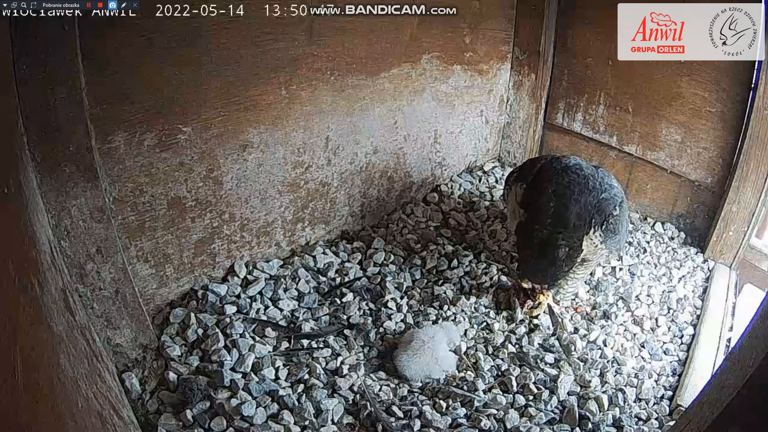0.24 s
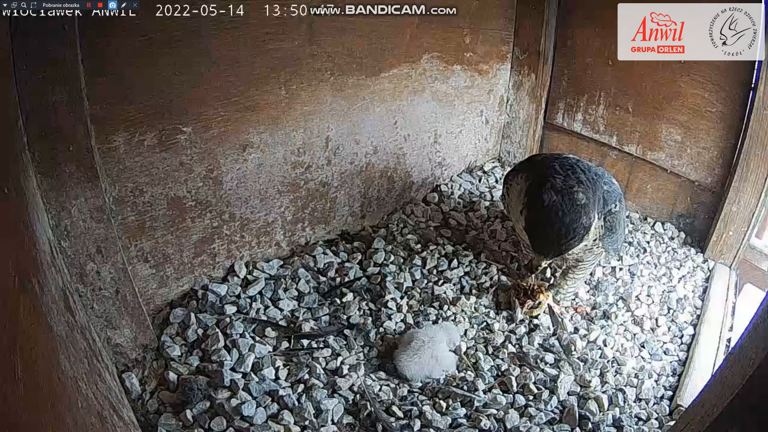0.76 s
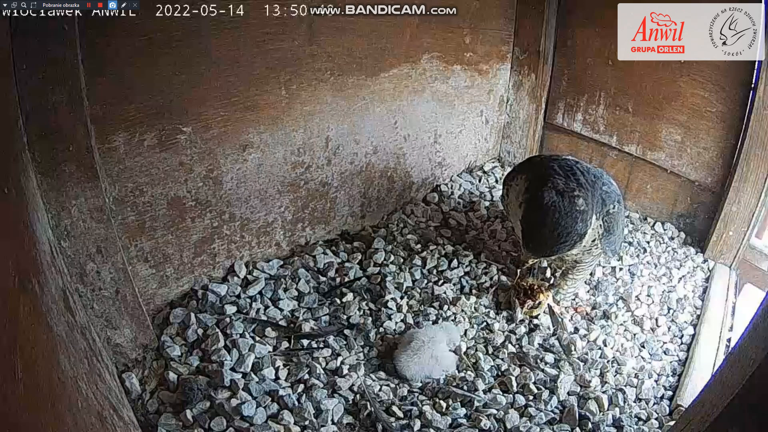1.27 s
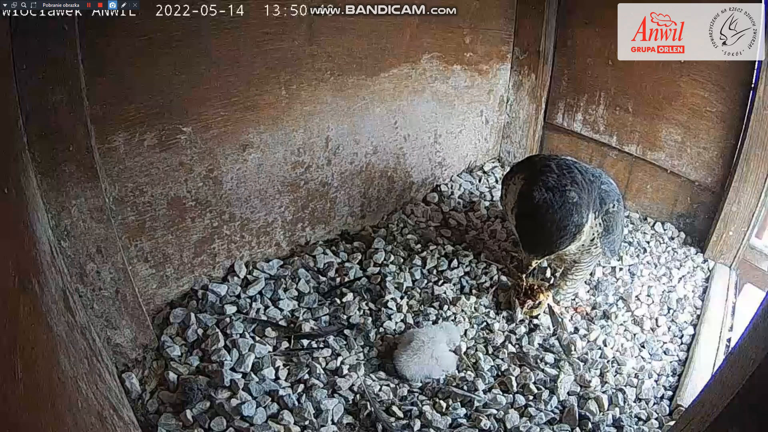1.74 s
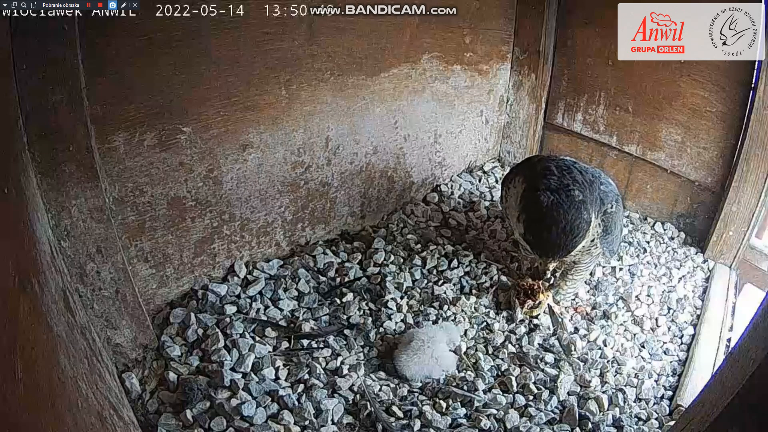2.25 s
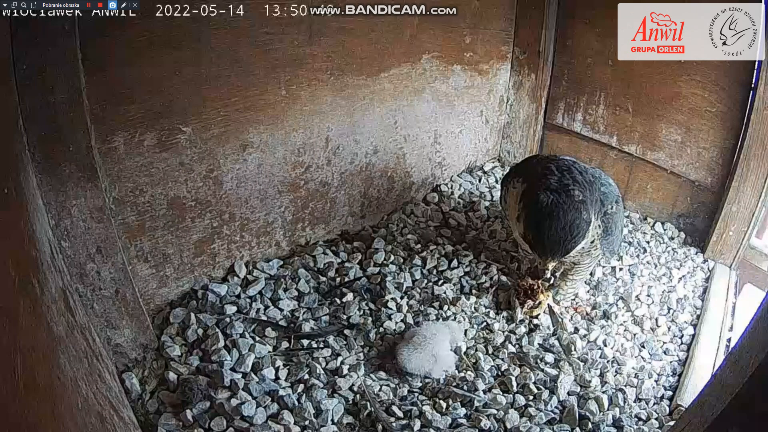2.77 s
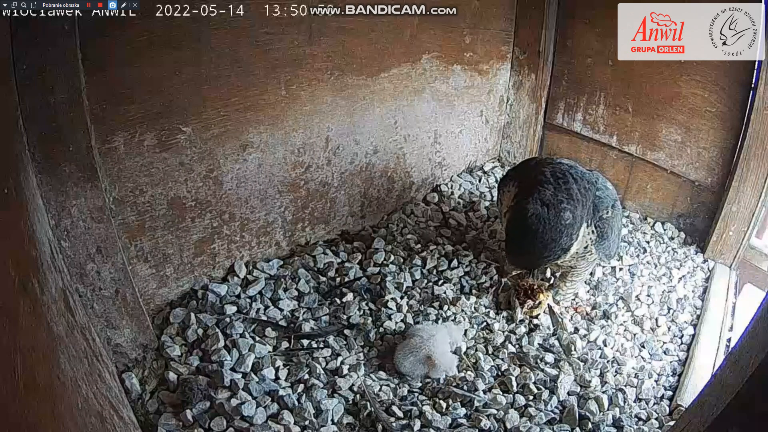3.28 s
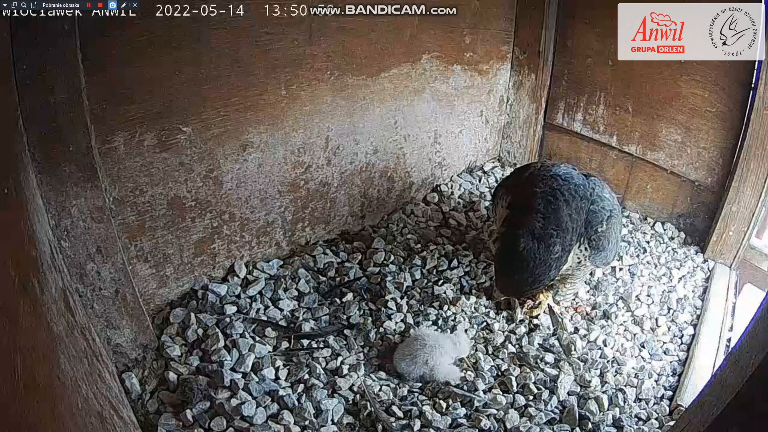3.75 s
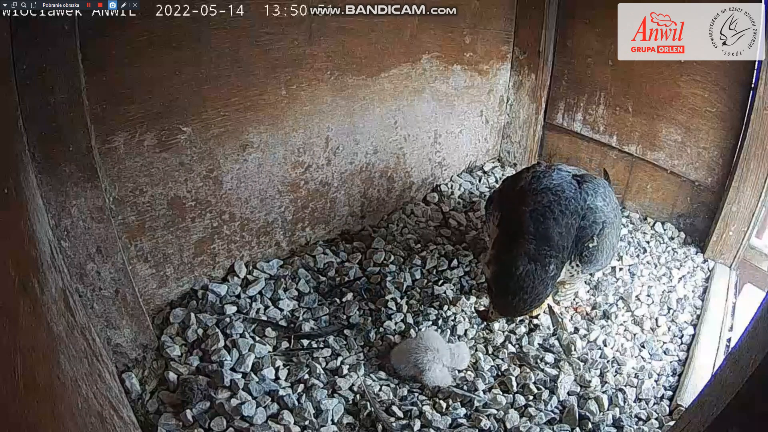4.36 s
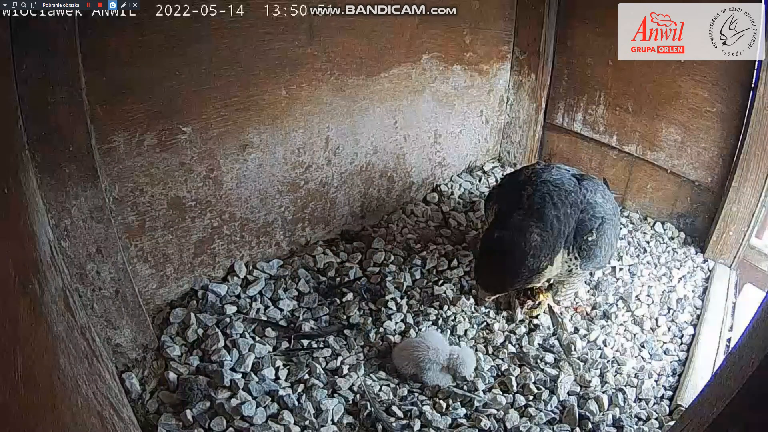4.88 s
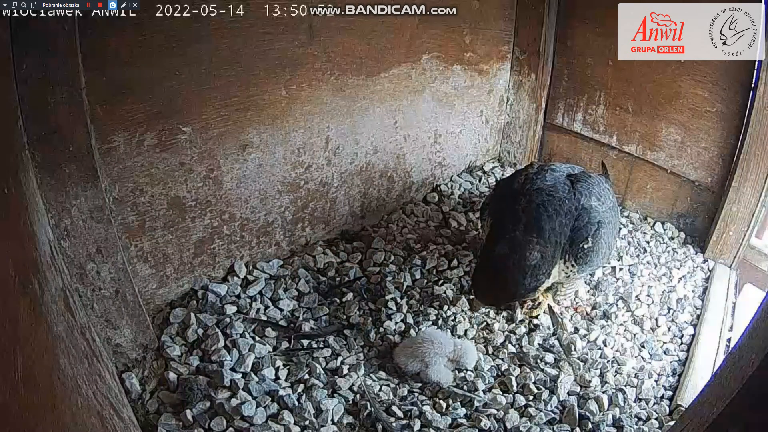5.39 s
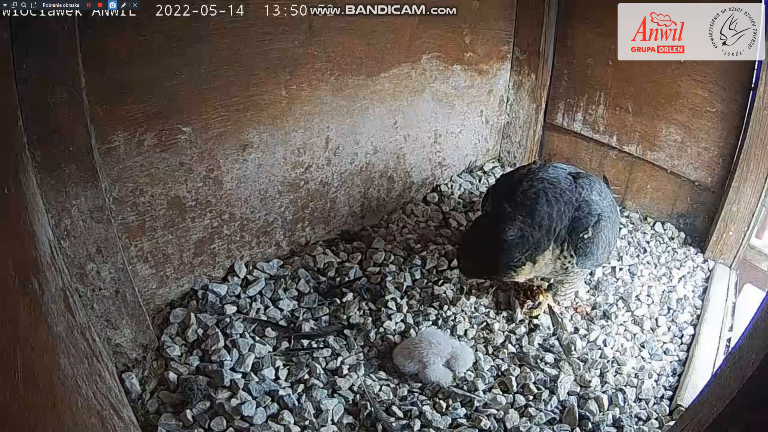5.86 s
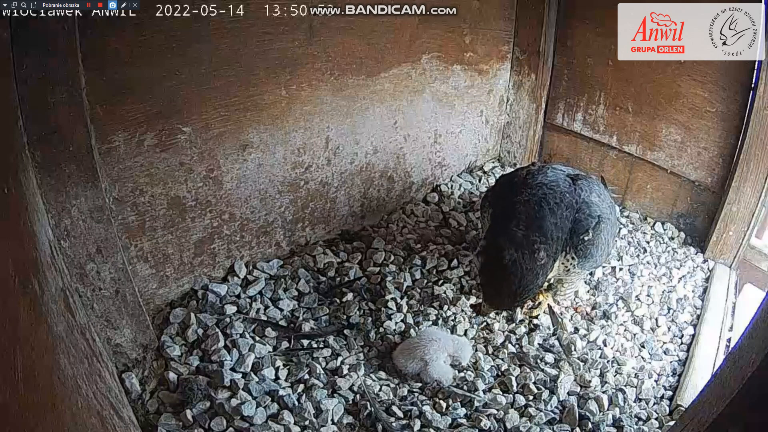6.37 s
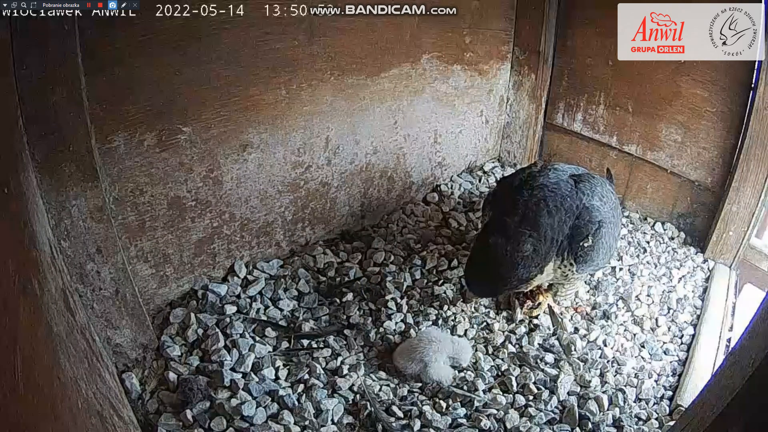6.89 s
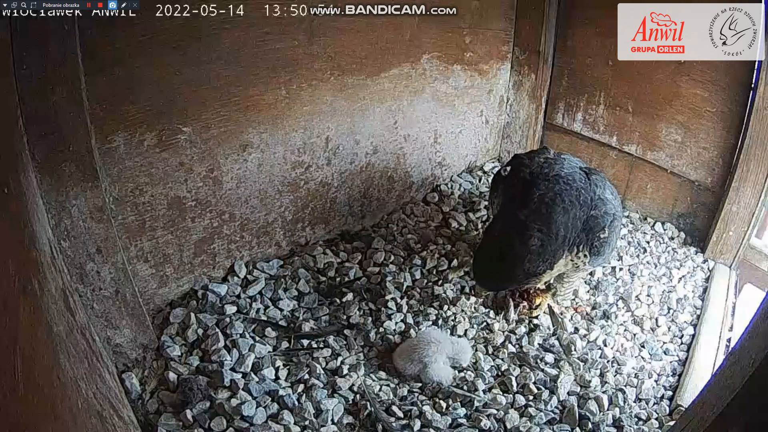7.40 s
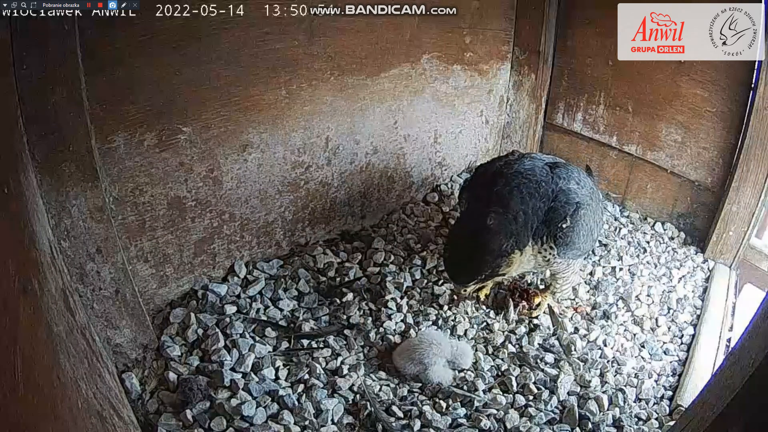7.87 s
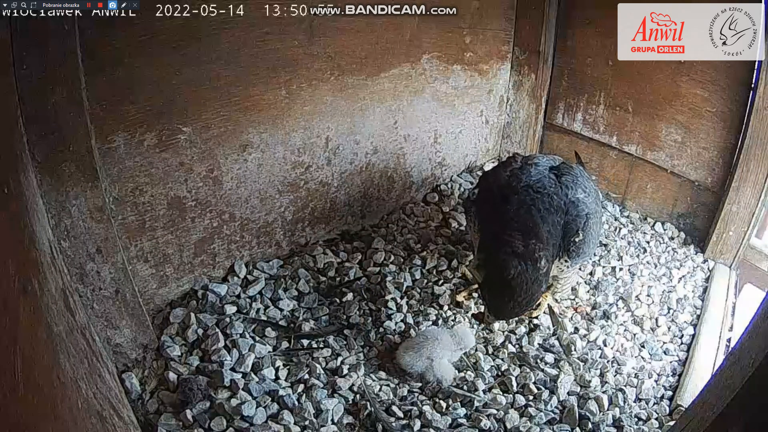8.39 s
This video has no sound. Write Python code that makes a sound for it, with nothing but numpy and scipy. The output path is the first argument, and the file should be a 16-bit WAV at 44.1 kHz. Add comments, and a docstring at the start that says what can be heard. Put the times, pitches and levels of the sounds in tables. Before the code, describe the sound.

A falcon gives sharp squeaky chups and throaty clucks in a wooden nest box, with faint chick peeps over a low steady hum.

```python
"""A wooden nest box hums from the start: noise shaped like air modes, a rush of wind and far traffic,
preamp hiss, and a faint camera tone gated once per picture. From about 1 s a falcon chups: gliding sines
form a thin rising whistle and a ladder of falling notes, then a pulse train rings a throaty croak.
Croaks also come alone as clucks, some ending in a yelp. From about 4 s a chick adds faint falling peeps.
Short decaying noise echoes the birds between the planks; peaks are rounded and the top is cut."""
import sys
import numpy as np
from scipy import signal
from scipy.fft import rfft, irfft, next_fast_len
from scipy.io import wavfile

SR = 44100
rng = np.random.default_rng(int(sys.argv[2]) if len(sys.argv) > 2 else 0)


def digitize_waveform(pressure):
    """Quantize a signal to 16-bit integers and store it at the path in sys.argv[1].

    Rows of a 2-D input are taken as channels; values are limited to [-1, 1].
    """
    field = np.atleast_2d(pressure).T
    bounded = np.clip(field, -1, 1)
    quanta = np.round(bounded * 32767).astype(np.int16)
    wavfile.write(sys.argv[1], SR, quanta)


N = 381024


def amp(db):
    """Decibel law: level in dB to amplitude gain."""
    return 10 ** (np.asarray(db) / 20)


def rms_one(x):
    """Power normalisation: scale to rms 1."""
    return x / np.sqrt(np.mean(x ** 2) + 1e-20)


def coloured(spectrum):
    """Spectral shaping: white noise weighted in the frequency domain, at rms 1."""
    size = next_fast_len(N)
    hz, db = np.transpose(spectrum)
    bins_hz = np.arange(1, size // 2 + 2) * SR / size
    gain = amp(np.interp(np.log(bins_hz), np.log(hz), db, left=-200, right=-200))
    return rms_one(irfft(rfft(rng.standard_normal(size)) * gain, size)[:N])


def drift(rate):
    """Low-pass random process: noise through two equal poles at the rate in Hz, at rms 1."""
    r = np.exp(-2 * np.pi * rate / SR)
    wander = signal.lfilter([1], [1, -2 * r, r * r], rng.standard_normal(N + SR))
    return rms_one(wander[SR:])      # the first second lets the filter settle


def resonance(x, hz, width):
    """Damped resonator: two poles, with gain 1 on top."""
    r = np.exp(-np.pi * width / SR)
    poles = [1, -2 * r * np.cos(2 * np.pi * hz / SR), r * r]
    return signal.lfilter([(1 - r * r) / 2, 0, (r * r - 1) / 2], poles, x)


# Low onset: rise and fall, first and last pitch
ONSET_MS, ONSET_HZ, ONSET_OCTAVE_DB = (2.7, 3.7), (1890, 2120), -14.5
WHISTLE_FROM_HZ, WHISTLE_OVERLAP_MS = 3650, 3      # the whistle runs on into the ladder
# Side whistle, peaking at the break; pitches and the top rung's pitch are ratios to the whistle's top
SIDE_MS, SIDE_RATIOS = (14, 7), (1.28, 1.35)
TOP_RUNG_MS, TOP_RUNG_RATIO = (3.1, 5.5), 0.93
# Middle rung: rise as a share of the ladder, run past the ladder's end, last over first pitch
MIDDLE_LAG_MS, MIDDLE_RISE_SHARE, MIDDLE_TAIL_MS, MIDDLE_SAG = 3.5, 0.4, 8, .94
PIP_LAG_SHARE, PIP_MS, PIP_HZ = 0.58, (11, 8.6), (5240, 5420)      # lag as a share of the ladder
MAIN_OCTAVE_DB, LEAD_OCTAVE_DB = -20, -7
# Chups of the falcon. Each row: start in seconds, whistle, ladder and main note lengths in ms, whistle top,
# middle rung, main note first and last pitch in Hz, peak position of whistle and main note as shares of
# their length [0-1], nominal levels in dB of low onset, whistle, side whistle, top rung, middle rung, pip,
# lead-in and main note, and octave partial of the middle rung in dB.
CHUP_NOTES = [(0.948, 35.1, 12.4, 22, 4980, 3360, 2070, 1864, 0.62, 0.59, -19.5, -25.5, -48.5, -22, -16, -26.5, -36, -8.5, -12),
              (1.697, 42.9, 17.5, 26, 4770, 3080, 1837, 1767, 0.1, 0.2, -32, -33.5, -59, -27.5, -14.5, -43, -41.5, -5.5, -32),
              (2.1, 42.7, 18, 26, 5044, 3230, 1959, 1935, 0.22, 0.4, -34, -28.5, -36.5, -24, -11.5, -28, -26.5, -4, -12),
              (3.085, 41.2, 12.4, 29.6, 4900, 3350, 2024, 1768, 0.18, 0.47, -29, -29, -37.5, -21, -15, -26.5, -38, -3, -20.5),
              (4.023, 35.9, 16, 17.3, 4850, 3195, 2077, 1926, 0.23, 0.65, -29.5, -30, -35, -11, -16, -29, -22, -7.5, -7.5),
              (5.307, 34.34, 10, 13, 4500, 3295, 2086, 1944, 0.19, 0.38, -32.5, -22.5, -33.5, -23, -14.5, -17, -38.5, -7.5, -3),
              (6.301, 37.62, 12, 25, 4765, 3295, 2073, 1908, 0.26, 0.23, -33, -23, -41, -5, -17, -17, -27.5, -5, -6.5),
              (7.338, 30, 7.3, 15.8, 4730, 3420, 2180, 1934, 0.19, 0.64, -29.5, -27, -42.5, -9.5, -27.5, -35.5, -40.5, -8.5, -24),
              (8.513, 30.6, 13, 16.7, 5110, 3413, 2190, 1920, 0.52, 0.39, -31, -18, -63, -11.5, -16, -25, -40, -9.5, -4.5)]


def chup_parts():
    """Two-voiced syrinx: pure whistles and notes with overtones, in the same layout in every chup."""
    pure, voiced = [], []
    for (s, whistle, ladder, main, top_hz, middle_hz, first_hz, last_hz, whistle_peak, main_peak,
         onset_db, whistle_db, side_db, top_db, middle_db, pip_db, lead_db, main_db,
         octave_db) in CHUP_NOTES:
        rungs = s + whistle / 1000      # the break from whistle to ladder
        lagged = rungs + MIDDLE_LAG_MS / 1000
        long = whistle + WHISTLE_OVERLAP_MS
        rise = MIDDLE_RISE_SHARE * ladder
        fall = ladder - rise - MIDDLE_LAG_MS + MIDDLE_TAIL_MS
        rung_hz = TOP_RUNG_RATIO * top_hz
        pure += [
            (s, whistle_peak * long, (1 - whistle_peak) * long, WHISTLE_FROM_HZ, top_hz, whistle_db),
            (rungs - SIDE_MS[0] / 1000, *SIDE_MS, *np.multiply(SIDE_RATIOS, top_hz), side_db),
            (rungs, *TOP_RUNG_MS, rung_hz, rung_hz, top_db),
            (rungs + PIP_LAG_SHARE * ladder / 1000, *PIP_MS, *PIP_HZ, pip_db)]
        voiced += [
            (s, *ONSET_MS, *ONSET_HZ, onset_db, ONSET_OCTAVE_DB),
            (lagged, rise, fall, middle_hz, MIDDLE_SAG * middle_hz, middle_db, octave_db),
            (lagged, ladder / 2, ladder / 2 - MIDDLE_LAG_MS, first_hz, first_hz, lead_db, LEAD_OCTAVE_DB),
            (rungs + ladder / 1000, main_peak * main, (1 - main_peak) * main,
             first_hz, last_hz, main_db, MAIN_OCTAVE_DB)]
    return pure, voiced


YELP_HZ, YELP_RISE_SHARE = (2177, 1920), 0.73      # first and last pitch; rise as a share of the length
# Yelps that end a cluck. Each row: start in seconds, length in ms, nominal level in dB,
# octave partial in dB.
YELP_NOTES = [(1.511, 29, -20, -14.5), (3.608, 12, -23, -13.5), (4.654, 15, -30.5, -26),
              (5.751, 18, -17, -14.5), (7.818, 13, -19.5, -22.5)]


def yelp_parts():
    """Harmonic voicing: each yelp is a falling note with overtones."""
    return [(s, YELP_RISE_SHARE * ms, (1 - YELP_RISE_SHARE) * ms, *YELP_HZ, db, octave_db)
            for s, ms, db, octave_db in YELP_NOTES]


def note(row, wobble):
    """Frequency modulation: phase is the running sum of a pitch whose rises level off and falls steepen."""
    s, rise, fall, first_hz, last_hz = row[:5]
    up, down = (max(int(ms * SR / 1000), 20) for ms in (rise, fall))
    at = slice(int(s * SR), int(s * SR) + up + down)
    attack = np.sin(np.linspace(0, np.pi / 2, up)) ** 1.1
    decay = np.cos(np.linspace(0, np.pi / 2, down)) ** .9
    u = np.linspace(0, 1, up + down)
    glide = 1 - (1 - u) ** 3 if last_hz > first_hz else u ** 1.15
    hz = first_hz + (last_hz - first_hz) * glide
    phase = 2 * np.pi * np.cumsum(hz * (1 + 0.013 * wobble[at])) / SR
    return at, np.r_[attack, decay], phase


BREATH_DB = -25     # mean level of the air noise for unit effort
# Spectrum of the escaping air. Each row: frequency in Hz, relative density in dB per Hz.
BREATH_SPECTRUM = [(600, -14.5), (1200, -3), (4500, 0.5), (7000, -5.5), (8000, 7)]


def whistles():
    """Syrinx oscillation: gliding tones, with turbulent air noise escaping in step."""
    out, effort = np.zeros(N), np.zeros(N)
    wobble, flutter = drift(190), amp(0.98 * drift(100))
    waver = amp(3.5 * drift(70))      # thin tones break up
    pure, voiced = chup_parts()
    for row in pure:
        at, shape, phase = note(row, wobble)
        # thin tones swell and fade more sharply
        out[at] += amp(row[5]) * shape ** 1.8 * waver[at] * np.sin(phase)
        effort[at] += amp(row[5] * 0.72) * shape     # breath grows more slowly than the tone
    for row in voiced + yelp_parts():
        at, shape, phase = note(row, wobble)
        db, octave_db = row[5:]
        # the third partial grows with loudness; overtones need the full effort
        overtones = amp(octave_db) * (np.sin(2 * phase) + amp(db) * np.sin(3 * phase))
        out[at] += amp(db) * shape * (np.sin(phase) + shape * overtones)
        effort[at] += amp(db * .55) * shape * (row[3] / 3300) ** 5    # slack low notes leak little air
    breath = amp(BREATH_DB + 3 * drift(120)) * effort * coloured(BREATH_SPECTRUM)
    return flutter * out + breath


CROAK_ATTACK_MS, CROAK_RELEASE_MS = 11, 18      # up to the first swell, down from the second
# Start and end relative to their swell; dip relative to the mean of both swells
CROAK_EDGE_DB, CROAK_DIP_DB = (-16.5, -16.5), -6.5
HOOT_LINGERS_DB = 6      # the fundamental gains on the pulses from start to end


def croak_shape(s, ms, first_hz, last_hz, first_db, second_db, low_db):
    """Breath envelope: attack, swell, dip, swell, release as times, levels, pulse rates, fundamental."""
    second = max(ms - CROAK_RELEASE_MS, CROAK_ATTACK_MS + 2)
    at = np.array([0, CROAK_ATTACK_MS, (CROAK_ATTACK_MS + second) / 2, second, ms])
    dip_db = (first_db + second_db) / 2 + CROAK_DIP_DB
    db = [first_db + CROAK_EDGE_DB[0], first_db, dip_db, second_db, second_db + CROAK_EDGE_DB[1]]
    rate = first_hz + (last_hz - first_hz) * at / ms
    return s + at / 1000, db, rate, low_db + HOOT_LINGERS_DB * (at / ms - .5)


# Spread of the pulse period and noise share, both at full roughness, which shrinks towards the clear rate
JITTER, RASP, CLEAR_HZ = .08, .55, 640
BEAK_FADE_S = 0.1      # time constant of the croak's treble decay
# Croaks, falling in rate after a chup, nearer level as a cluck on their own. Each row: start in seconds,
# length in ms, first and last mean pulse rate in Hz, first and second swell in dB, and fundamental
# in dB above that level at mid-croak.
CROAK_EVENTS = [(1.015, 52.9, 731, 326.4, -17, -23.5, -4), (1.491, 57.6, 345.2, 430, -21.5, -32, -7),
                (1.778, 32.9, 593, 319.5, -26, -24.5, -1), (2.185, 34.4, 614, 312.5, -24, -26, -1.5),
                (2.758, 64.5, 426, 384.4, -20.5, -26.5, -1), (3.166, 22.24, 549, 317, -31, -35, 1.5),
                (3.56, 37.2, 413, 440, -21, -21, -2), (4.089, 40.3, 716, 314, -15, -26, -4.5),
                (4.615, 72.8, 377, 516, -15.5, -32, -6.5), (5.366, 40.6, 721, 277, -13, -19, -4),
                (5.717, 48, 419, 408, -16, -24.5, -3), (6.374, 28.06, 652, 293, -23, -22.5, -3),
                (6.788, 58.8, 386.7, 454, -16, -21.5, -5), (7.393, 45.7, 704, 319, -13.5, -23.5, -4),
                (7.792, 59.2, 346.3, 438, -19, -30.5, -5), (8.573, 40.5, 734, 282, -14, -21.5, -3)]
# Resonances of the throat, rung by pulses. Each row: centre in Hz, width in Hz, relative gain in dB.
THROAT_MODES = [(1327, 685, 0), (1630, 481, 2.5)]
# Resonances of the open beak, filled by air noise. Each row: centre in Hz, width in Hz,
# level before the treble fade in dB relative to the throat.
BEAK_MODES = [(2620, 840, -18.5), (4080, 2000, -21), (5000, 170, -30), (7100, 700, -37)]


def croaks():
    """Source-filter principle: pulses ring the throat, rougher as they slow, over a soft fundamental."""
    out = np.zeros(N)
    for row in CROAK_EVENTS:
        s, db, rate, low_db = croak_shape(*row)
        start = int(s[0] * SR)
        t = np.arange(start, min(int(s[-1] * SR), N)) / SR
        hz, level = np.interp(t, s, rate), amp(np.interp(t, s, db))
        rough = np.clip((CLEAR_HZ - hz) / 250, .3, 1)
        # period and strength offsets, each held for 64 samples
        uneven = np.repeat(rng.standard_normal((200, 2)), 64, axis=0)[:len(t)]
        air = rng.standard_normal((6, 12800))[:, :len(t)]
        cycles = np.cumsum(hz * (1 + JITTER * rough * uneven[:, 0])) / SR
        openings = np.diff(np.floor(cycles), prepend=-1) > 0
        pulses = openings * amp(4 * rough * uneven[:, 1])
        puffs = air * np.exp(-1.5 * (cycles % 1))      # noise bursts at each opening
        source = rms_one(pulses) + RASP * rough * puffs[-1]
        # neighbouring modes add with opposite sign
        throat = rms_one(sum((-1) ** k * amp(d) * resonance(source, f, w)
                             for k, (f, w, d) in enumerate(THROAT_MODES)))
        beak = sum(amp(d) * rms_one(resonance(puff, f, w))
                   for puff, (f, w, d) in zip(puffs, BEAK_MODES))
        # the treble needs effort and dies first
        bright = (level / level.max()) ** 0.3 * np.exp((t[0] - t) / BEAK_FADE_S)
        hoot = np.sqrt(2) * amp(np.interp(t, s, low_db)) * np.sin(2 * np.pi * np.cumsum(hz) / SR)
        edges = np.clip(np.minimum(t - t[0], t[-1] - t) / 0.0019, 0, 1)
        out[start:start + len(t)] += level * edges * (throat + bright * beak + hoot)
    return out


# When the pitch drops and how gradually, as shares of the length
PEEP_DROP_SHARE, PEEP_DROP_WIDTH = .42, .2
# Faint falling peeps of the chick. Each row: start in seconds, length in seconds,
# upper and lower limit of the pitch drop in Hz, level before the waver in dB.
PEEP_NOTES = [(4.244, 0.081, 2400, 1630, -50), (4.821, 0.068, 2300, 1580, -48.5),
              (5.899, 0.12, 2450, 1560, -46), (6.452, 0.068, 2550, 1510, -51),
              (6.995, 0.081, 2480, 1650, -47), (8.04, 0.061, 2350, 1610, -52)]


def peeps():
    """Harmonic synthesis: thin falling tones with two overtones, loudest towards the end."""
    out = np.zeros(N)
    waver = amp(4.5 * drift(45))
    for s, length, high_hz, low_hz, db in PEEP_NOTES:
        u = np.linspace(0, 1, int(length * SR))
        at = slice(int(s * SR), int(s * SR) + len(u))
        drop = (1 + np.tanh((u - PEEP_DROP_SHARE) / PEEP_DROP_WIDTH)) / 2
        phase = 2 * np.pi * np.cumsum(high_hz + (low_hz - high_hz) * drop) / SR
        tone = np.sin(phase) + amp(-21) * np.sin(2 * phase) + amp(-27.5) * np.sin(3 * phase)
        out[at] += amp(db) * np.sin(np.pi * u ** 2.1) * waver[at] * tone
    return out


BOX_T60_S, BOX_DB = 0.03, -13      # first reflections; level of all echoes
TAIL_T60_S, TAIL_DB = .15, -18      # a longer decay, relative to the first reflections


def nest_box(x):
    """Diffuse reverberation: dense short reflections between plank walls, with a fainter, longer tail."""
    t = np.arange(int(.3 * SR)) / SR
    decay = amp(-60 * t / BOX_T60_S) + amp(TAIL_DB - 60 * t / TAIL_T60_S)
    echoes = rng.standard_normal(len(t)) * decay * (t > .002)
    return signal.fftconvolve(x, echoes / np.sqrt(np.sum(echoes ** 2)))[:N]


# Bands of the rush that swell on their own, their spread and the corner rate of their drift
PATCH_EDGES_HZ, PATCH_DB, PATCH_RATE_HZ = [2300, 2800, 3400, 4200, 5300, 7500], 3, 4
# Spectrum of the rush outside. Each row: frequency in Hz, relative density in dB per Hz.
RUSH_SPECTRUM = [(410, -42), (700, -14), (988, -18.5), (1240, -3), (1580, -4), (1700, 1.5), (1970, -15.5),
                 (2570, -24), (3010, -22), (5800, -29.5), (7540, -58), (12800, -120)]
# Slow swells of the rush. Each row: time in seconds, level before the faster drifts in dB.
GUST_LEVELS = [(0, -57), (2.901, -54), (3.352, -49), (4.299, -57.5), (4.898, -52), (6.097, -56.5),
               (8.64, -56)]


def outside():
    """Modulated broadband noise: the rush of wind and traffic, its treble in narrow patches."""
    rush = coloured(RUSH_SPECTRUM)
    bands = []
    for edge in zip(PATCH_EDGES_HZ, PATCH_EDGES_HZ[1:]):
        band_pass = signal.butter(2, edge, "band", fs=SR, output="sos")
        bands.append(signal.sosfiltfilt(band_pass, rush))
    treble = sum(amp(PATCH_DB * drift(PATCH_RATE_HZ)) * band for band in bands)
    gusts = amp(np.interp(np.arange(N) / SR, *np.transpose(GUST_LEVELS)))
    return gusts * (amp(1.3 * drift(7.2)) * (rush - sum(bands)) + treble)


# Spectrum of the box's air modes. Each row: frequency in Hz, relative density in dB per Hz.
DRONE_SPECTRUM = [(15, -69), (25, -45), (59, -16), (80, -0.5), (97, -0.5), (135, -7), (157, -22),
                  (236, -17), (283, -34.5), (401, -29), (436, -27.5), (700, -45.5), (910, -76),
                  (1540, -120)]


def box_drone():
    """Modal colouring: steady noise, shaped as wind and far traffic droning in the box's air modes."""
    return amp(-31) * coloured(DRONE_SPECTRUM)


# Spectrum of the preamp hiss. Each row: frequency in Hz, relative density in dB per Hz.
HISS_SPECTRUM = [(4500, -30), (6000, -12), (6300, -16), (7300, -4), (7800, 7)]


def preamp_hiss():
    """Electronic noise: steady random hiss of the preamp."""
    return amp(-65.5) * coloured(HISS_SPECTRUM)


PICTURES_PER_S = 29.964
WHINE_START, WHINE_DUTY = .77, .35      # shares of the picture period
# Tones leaking from the camera electronics. Each row: frequency in Hz, peak level in dB.
WHINE_TONES = [(6355, -58.5), (6710, -70), (7310, -67.5)]


def camera_whine():
    """Periodic gating: the same short tone burst, phase restarted, in every picture period."""
    since = (np.arange(N) / SR * PICTURES_PER_S - WHINE_START) % 1
    gate = np.clip(np.minimum(since, WHINE_DUTY - since) / .05, 0, 1)
    return gate * sum(amp(db) * np.sin(2 * np.pi * hz * since / PICTURES_PER_S) for hz, db in WHINE_TONES)


def scene():
    """Superposition: birds and their echoes over rush, drone, hiss and whine."""
    birds = whistles() + croaks() + peeps()
    echoes = amp(BOX_DB) * nest_box(birds)
    background = outside() + box_drone() + preamp_hiss() + camera_whine()
    return (birds + echoes + background)[None]


OVERLOAD, STOPBAND_HZ = .95, 8190      # limiting amplitude; edge where the cut reaches 60 dB


def record(dry):
    """Soft saturation and low-pass filtering: the loudest peaks are rounded and the top is cut steeply."""
    rounded = dry / (1 + np.abs(dry / OVERLOAD) ** 6) ** (1 / 6)
    return signal.sosfilt(signal.cheby2(14, 60, STOPBAND_HZ, fs=SR, output="sos"), rounded)


dry = scene()
out = record(dry)
digitize_waveform(out)
```